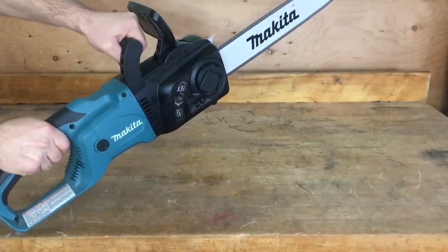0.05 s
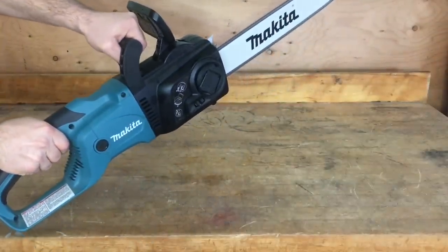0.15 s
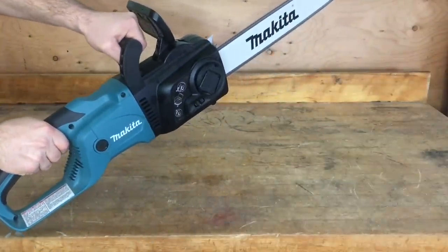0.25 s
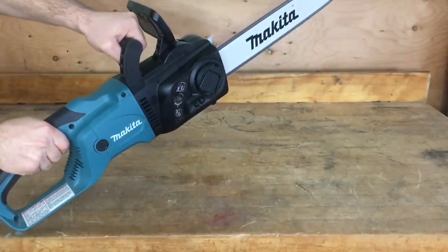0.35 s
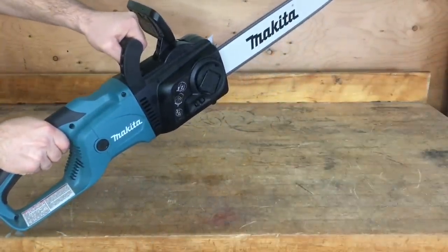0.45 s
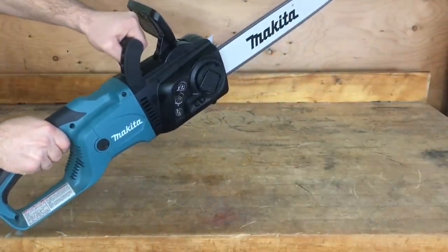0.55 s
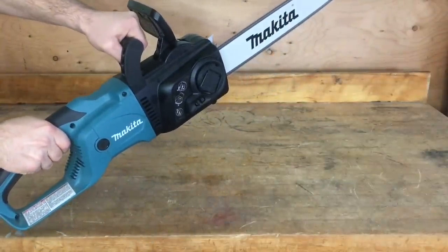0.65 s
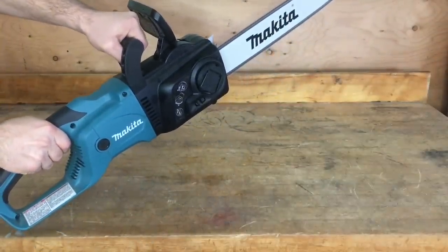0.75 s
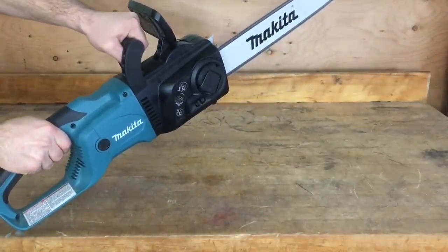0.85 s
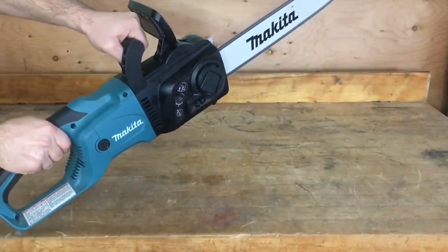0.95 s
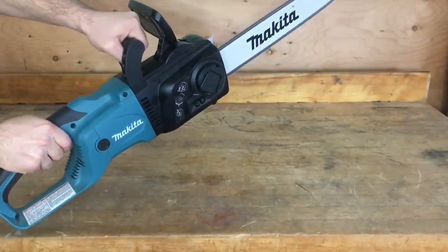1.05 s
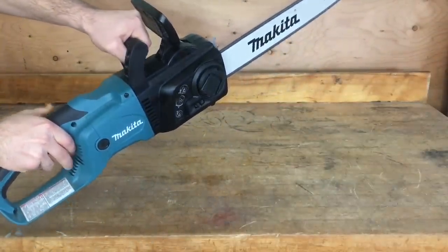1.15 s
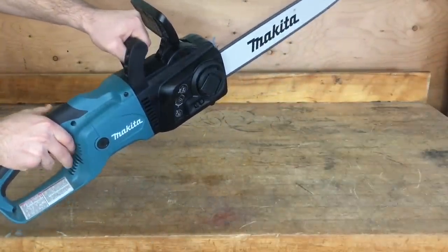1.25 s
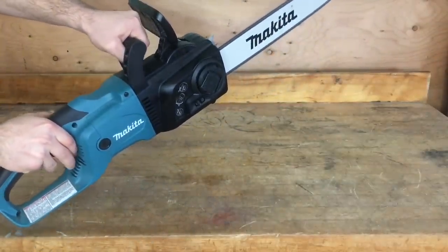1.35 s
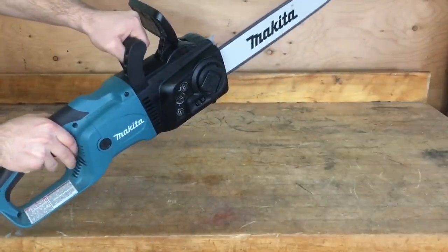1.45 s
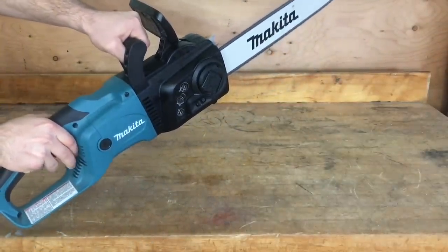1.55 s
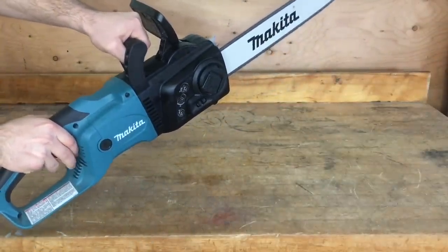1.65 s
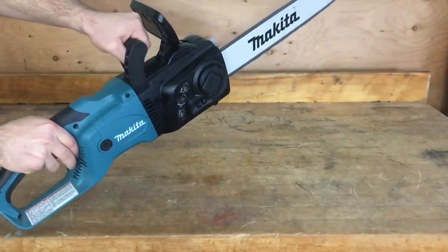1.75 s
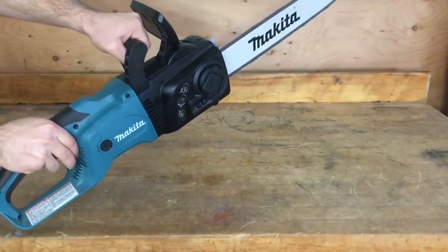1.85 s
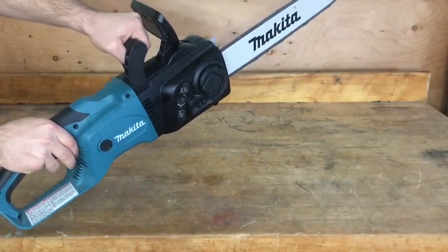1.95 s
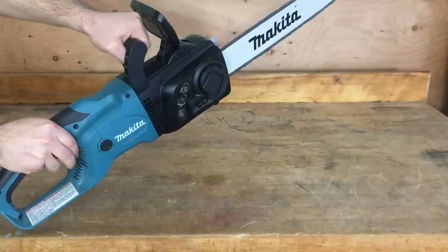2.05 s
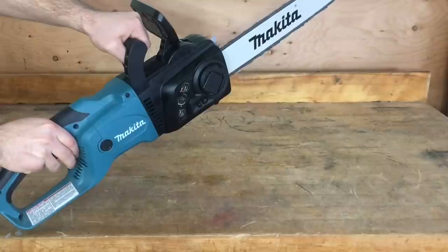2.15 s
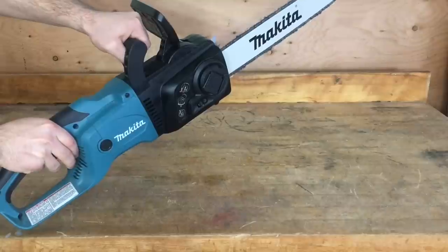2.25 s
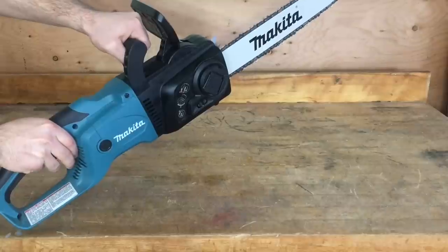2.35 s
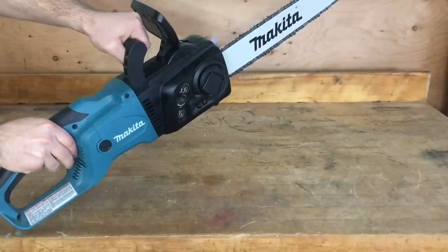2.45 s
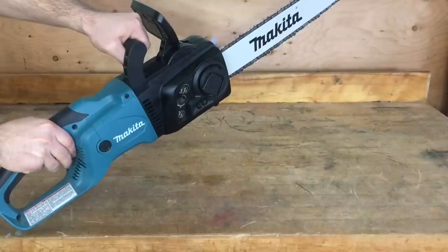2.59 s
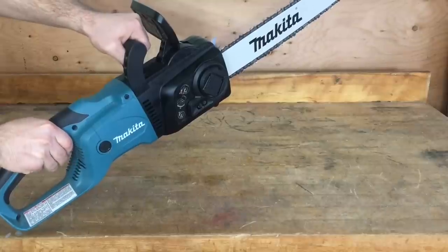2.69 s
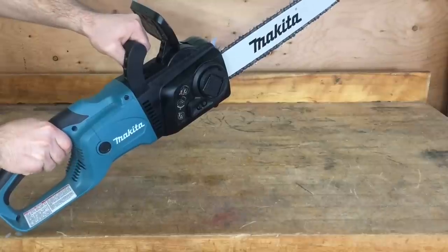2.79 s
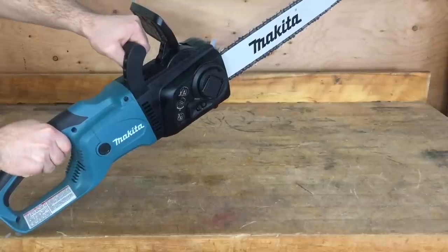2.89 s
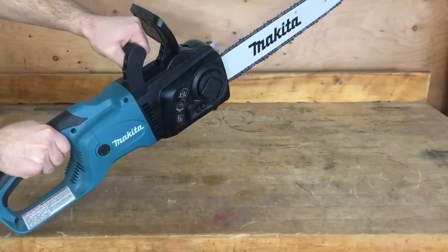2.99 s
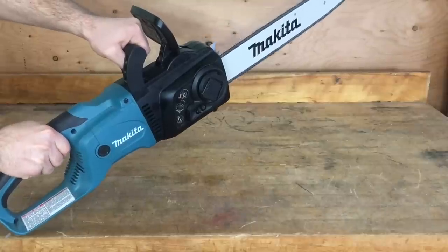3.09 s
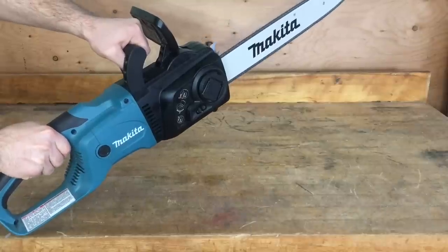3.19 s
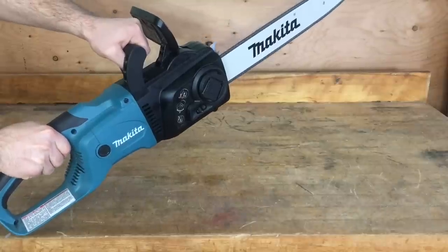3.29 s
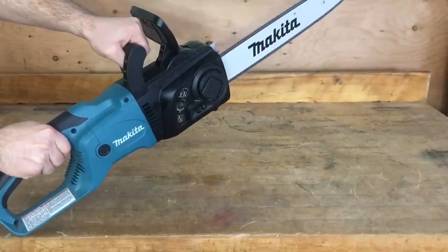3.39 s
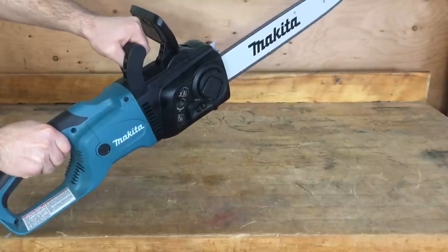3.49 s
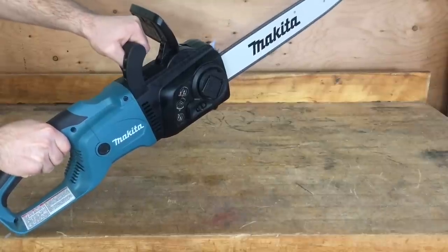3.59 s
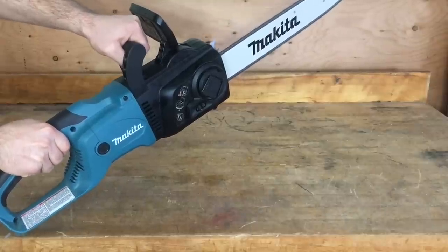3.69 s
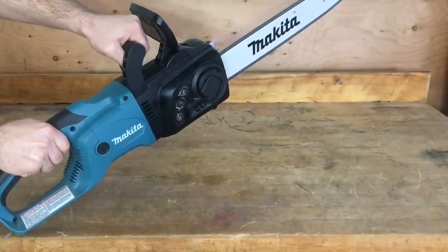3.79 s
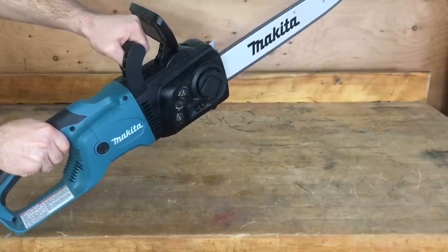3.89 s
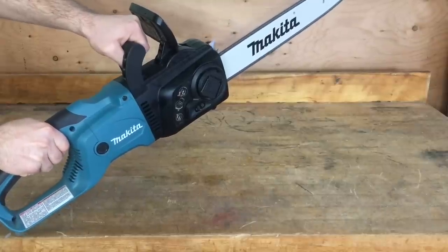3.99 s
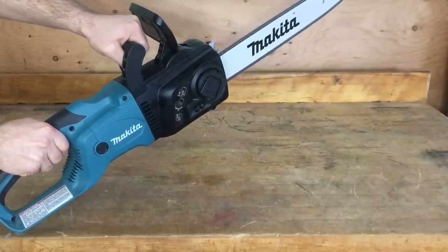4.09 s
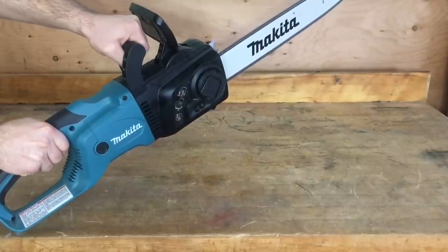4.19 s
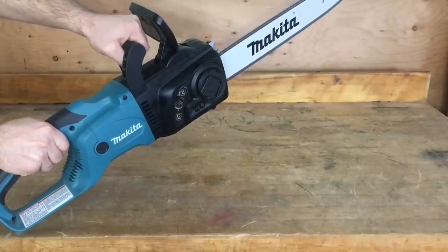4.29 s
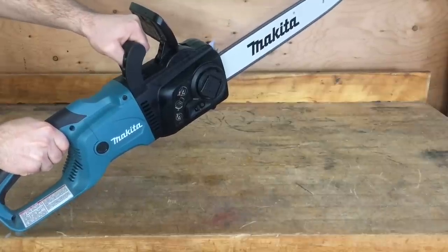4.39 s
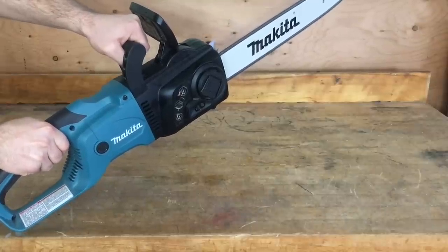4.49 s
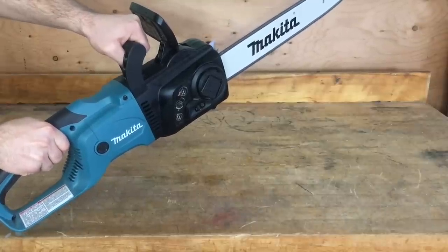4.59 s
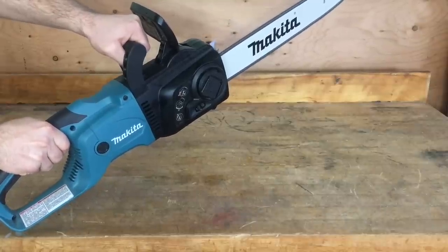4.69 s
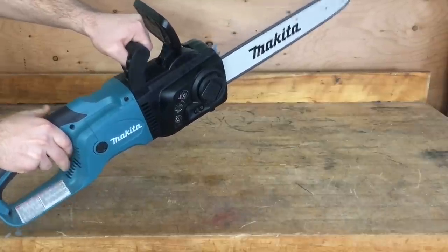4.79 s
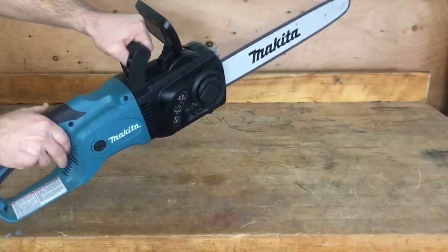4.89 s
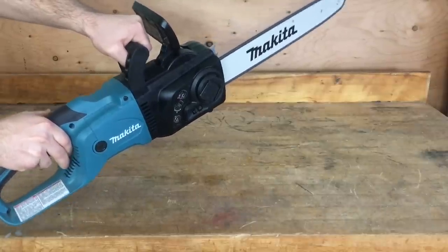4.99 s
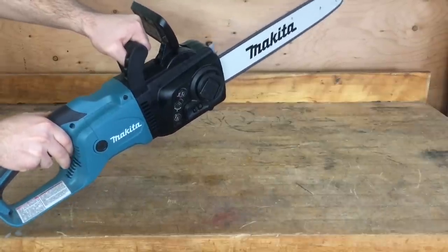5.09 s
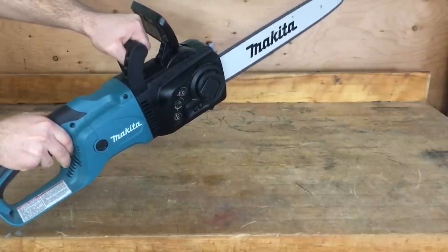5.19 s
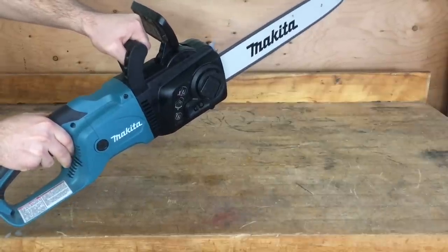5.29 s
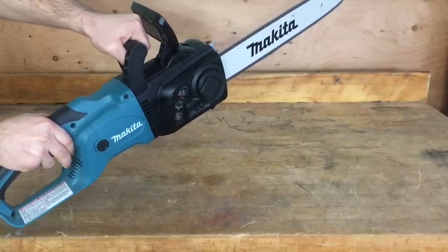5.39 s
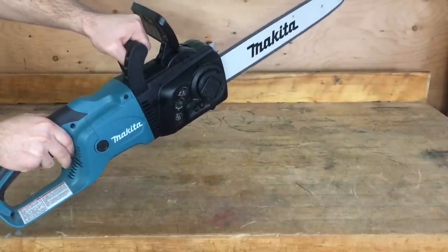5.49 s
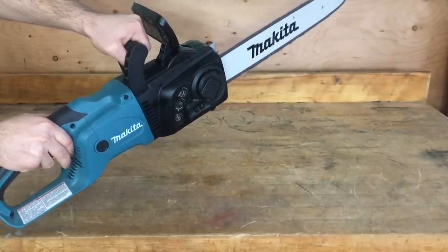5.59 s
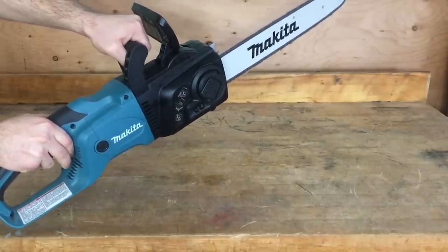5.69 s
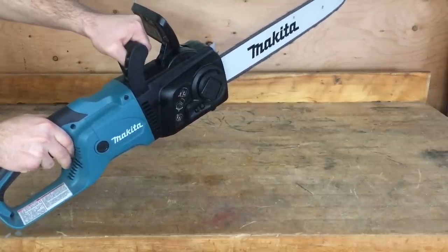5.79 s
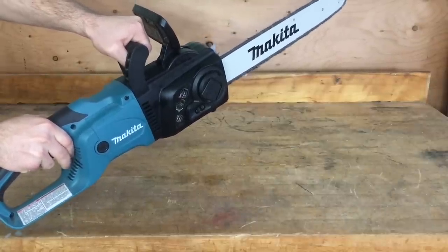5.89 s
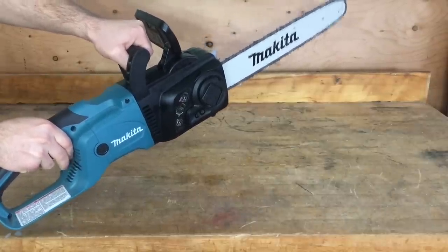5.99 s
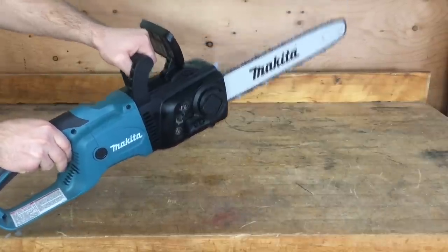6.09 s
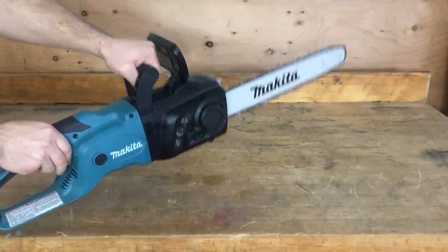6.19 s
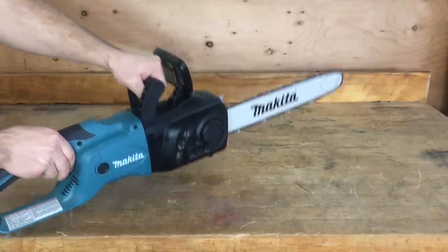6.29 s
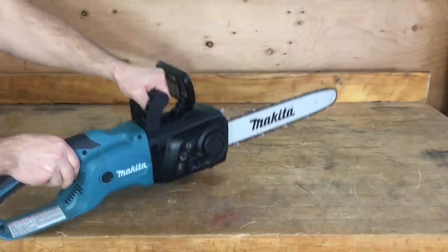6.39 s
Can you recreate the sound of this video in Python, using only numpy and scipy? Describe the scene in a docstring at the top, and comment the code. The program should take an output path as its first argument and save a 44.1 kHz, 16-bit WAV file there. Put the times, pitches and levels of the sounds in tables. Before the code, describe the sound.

An electric chainsaw, close to the microphone in a small wooden workshop, is already revving up to a bright, hissing whine. The trigger is released; the chain jolts, rattles and slows into separate clunks and ticks. After a quiet pause the trigger clicks, a low buzz and a dull knock start the chain, pitch climbs fast to full speed, and it is braked to rest again.

```python
"""An electric chainsaw runs free in a small wooden workshop, close to a mono microphone.
It finishes one run-up, is braked and coasts to rest link by link; the trigger clicks, the soft start buzzes,
and a second run-up ends the same way. Links are random clicks through housing and clink spectra, the rush is
shaped noise, hum, gears and magnetic whine are sines; all follow the rotor speed. A dying tail of echoes,
faint air noise and a slow gain control surround them."""
import sys
import numpy as np
from scipy import signal
from scipy.fft import rfft, irfft
from scipy.io import wavfile
from scipy.ndimage import uniform_filter1d

SR = 44100
rng = np.random.default_rng(int(sys.argv[2]) if len(sys.argv) > 2 else 0)


def ratio_of_db(decibels):
    """Turn decibels (scalar or array-like) into linear amplitude factors; 0 dB maps to 1."""
    return 10 ** (np.asarray(decibels, float) / 20)


def store_pcm(level_fs):
    """Save levels as 16-bit WAV."""
    pcm = np.round(np.clip(level_fs, -1, 1) * 32767).astype(np.int16)
    wavfile.write(sys.argv[1], SR, np.atleast_2d(pcm).T)


N = 284445

# soft start chopping the mains: t after power on/s, buzz level/dB, brush tick level/dB, judder/0-1
SOFT_START = [(-.03, -110, -120, 0), (-.012, -70, -64, .6), (.035, -62, -62, .9), (.06, -57, -80, .9),
              (.2, -50, -120, .7), (.6, -49, -120, .5), (.72, -57, -120, 0), (1.7, -63, -120, 0),
              (1.85, -95, -120, 0)]
# housing spectrum: f/Hz, density/dB per Hz
HOUSING_SPECTRUM = [(88, -53), (150, -26), (758, -4.5), (832, -4), (1800, -4), (2340, -4.5), (2690, -3.5),
                    (4020, -6.5), (4830, -15.5), (6000, -13), (7800, -47.5), (13200, -120)]
# housing and bar resonances: f/Hz, width/Hz, boost/dB
HOUSING_MODES = [(823, 35, 4.5), (866, 24, 2.5), (909, 35, 4.5), (1320, 60, 5.5), (2118, 40, 5),
                 (2335, 90, 7.5), (2640, 70, 2.5), (3080, 60, 4), (3215, 70, 6), (3340, 80, 6),
                 (3458, 70, 5), (3960, 150, 5)]
# clink of slow links: f/Hz, density/dB per Hz
CLINK_SPECTRUM = [(2650, -26), (4500, -17.5), (5060, -12.5), (6150, -3), (7980, -7.5), (8970, -0.5),
                  (10600, -8.5), (11900, -1), (15000, 1.5), (16000, -9)]

CHOP_HZ = 120
LINKS_PER_TURN = 2
JOLT_DECAY_S = .11   # the brake shakes the chain


def rms_one(x):
    """Scale to rms 1."""
    return x / np.sqrt(np.mean(x ** 2) + 1e-20)


def drift(rate_hz):
    """Slow chance of rms 1: noise through two equal poles at rate_hz."""
    r = np.exp(-2 * np.pi * rate_hz / SR)
    noise = rng.standard_normal(N + SR)
    return rms_one(signal.lfilter([1], [1, -2 * r, r * r], noise)[SR:])


def response(spectrum, modes=()):
    """Minimum-phase impulse response, peak 1, of a spectrum with resonances on top."""
    hz = np.maximum(np.arange(16384 // 2 + 1) * SR / 16384, 1)
    spectrum_hz, spectrum_db = np.transpose(spectrum)
    db = np.interp(np.log(hz), np.log(spectrum_hz), spectrum_db)
    for centre_hz, width_hz, boost_db in modes:
        db += boost_db / (1 + (2 * (hz - centre_hz) / width_hz) ** 2)
    cepstrum = irfft(db * np.log(10) / 20)
    half = len(cepstrum) // 2
    cepstrum[1:half] *= 2   # fold the cepstrum forward in time
    cepstrum[half + 1:] = 0
    impulse = irfft(np.exp(rfft(cepstrum)))[:half]
    return impulse / np.abs(impulse).max()


def through(x, impulse):
    """Convolve, cut to N samples."""
    return signal.fftconvolve(x, impulse)[:N]


def evened(x):
    """Local rms brought to 1, so that a level curve sets the loudness at any click rate."""
    return x / np.sqrt(uniform_filter1d(x ** 2, size=8000) + 1e-12)


def dulled(x, cutoff_hz):
    """One-pole low-pass: a softer contact."""
    return signal.sosfilt(signal.butter(1, cutoff_hz, fs=SR, output="sos"), x)


def band_noise(low_hz, high_hz):
    """Noise of rms 1 in one band."""
    sos = signal.butter(2, [low_hz, high_hz], "band", fs=SR, output="sos")
    return rms_one(signal.sosfilt(sos, rng.standard_normal(N)))


def read(rows, at):
    """Each column of a table at the given values of its first."""
    first, *columns = np.transpose(rows)
    return [np.interp(at, first, c) for c in columns]


def blows(events, impulse, bounce_s):
    """Each blow is a click with a short dying scatter of bounces."""
    at_s, level_db = np.transpose(events)
    t = np.arange(2000) / SR
    scatter = rng.standard_normal((len(at_s), len(t))) * .53 * np.exp(-t / bounce_s)
    scatter[:, 0] = 1
    clicks = np.zeros(N + len(t))
    for s, db, burst in zip(at_s, level_db, scatter):
        start = round(s * SR)
        clicks[start:start + len(t)] += ratio_of_db(db) * burst
    return through(clicks[:N], impulse)


def since(column):
    """Seconds since power on, release or rest (column 0, 1, 2) of the run that is under way."""
    # runs: power on t/s, trigger let go t/s, chain at rest t/s
    runs = [(-.65, 1.16, 2.315), (3.0, 4.805, 5.99)]
    t = np.arange(N) / SR
    pauses_s = [(done[2] + coming[0]) / 2 for done, coming in zip(runs, runs[1:])]
    return t - np.array(runs)[np.searchsorted(pauses_s, t), column]


def driven_speed(s):
    """Turns per second under power: a soft ramp, then the gap to top speed closes exponentially."""
    ramp_turns_per_s2, full_power_s, top_turns_per_s = 392, .6, 385
    settle_s, surge_share, surge_s = .363, .093, .08   # a small share of the gap closes at once
    full_s = np.maximum(s - full_power_s, 0)
    gap = (1 - surge_share) * np.exp(-full_s / settle_s) + surge_share * np.exp(-full_s / surge_s)
    ramp = ramp_turns_per_s2 * np.clip(s, 0, full_power_s)
    return ramp + (top_turns_per_s - ramp) * (1 - gap)


def rotor():
    """Turns per second: ramp, settle, then coast under drag and friction."""
    friction_turns_per_s = 70   # air drag rules above this speed, friction below
    on, off, rest = since(column=0), since(column=1), since(column=2)
    left = np.clip(rest / (rest - off), 0, 1)
    start_angle = np.arctan(driven_speed(on - off) / friction_turns_per_s)
    coasting = friction_turns_per_s * np.tan(left * start_angle)
    return np.where(off < 0, driven_speed(on), coasting)


def contacts(speed, loose_per_link, spread_db, slide):
    """Links strike the sprocket in turn, loose contacts fall in clumps, and the chain slides in its groove."""
    sprocket_teeth = 6
    links = np.cumsum(LINKS_PER_TURN * speed) / SR + .12 * drift(40)
    strike = np.diff(np.maximum.accumulate(np.floor(links)), prepend=0) > 0
    tooth_db = 2 * np.cos(2 * np.pi * links / sprocket_teeth)   # the sprocket runs off centre
    loose_per_s = loose_per_link * LINKS_PER_TURN * speed * ratio_of_db(tooth_db + 3 * drift(35))
    loose = rng.random(N) < loose_per_s / SR
    sizes = ratio_of_db(spread_db * np.minimum(rng.exponential(1, N), 3)) * rng.choice([-1, 1], N)
    return sizes * (strike * ratio_of_db(tooth_db + 4.5) + loose) + slide * rng.standard_normal(N)


def housing(x, ring):
    """Housing resonances, boosted ring-fold in dB, that waver randomly a little higher and lower."""
    wander_share, wander_hz = .009, 8   # share of pitch between the lowest and highest tuning
    lean = np.pi / 4 * (1 + np.tanh(drift(wander_hz)))

    def tuned(way):
        modes = [(hz * (1 + way * wander_share), width_hz, db) for hz, width_hz, db in HOUSING_MODES]
        return through(x, response(HOUSING_SPECTRUM, modes * ring))
    return evened(np.cos(lean) ** 2 * tuned(-.5) + np.sin(lean) ** 2 * tuned(.5))


def chain_levels(speed):
    """Loudness follows speed; a faint swell while slack, more rattle under the brake."""
    # chain: speed/turns per s, housing rattle level/dB, bright rush of links and air level/dB
    by_speed = [(0, -110, -110), (0.99, -61, -46.5), (14.96, -51, -45), (23.44, -43, -39.5),
                (46.7, -33.5, -34.5), (88.5, -23.5, -27.5), (135.2, -18.5, -20), (224.4, -18, -12),
                (237, -16.5, -9), (373, -16, -2)]
    rattle_db, bright_db = read(by_speed, speed)
    bitten, off = since(column=0) - .104, since(column=1)   # slack until the sprocket bites
    jolt_db, jolt_rise_s = 7, .02
    rattle_db += jolt_db * np.clip(off / jolt_rise_s, 0, 1) * np.exp(-np.abs(off) / JOLT_DECAY_S)
    lumps_db, lumps_hz, lumps_below_turns_per_s = 4.5, 45, 130   # a slow chain rattles unevenly
    rattle_db += lumps_db * np.clip(1 - speed / lumps_below_turns_per_s, 0, 1) * drift(lumps_hz)
    not_taut = np.exp(-np.abs(bitten) / .035)   # the links brighten as the chain pulls taut
    bright_db -= 12.5 * not_taut
    rattle_db -= 15.5 * not_taut
    slack_rattle_db, slack_bright_db, swell_db_per_s = -44, -52.5, 190
    swell_db = swell_db_per_s * bitten   # the slack shiver swells up to the bite
    return (np.where(bitten < 0, slack_rattle_db + swell_db, rattle_db),
            np.where(bitten < 0, slack_bright_db + swell_db, bright_db))


def chain(speed):
    """The contacts shake the housing and clink; with speed the clink melts into a rush of air."""
    # rush of air: f/Hz, density/dB per Hz
    rush_spectrum = [(50, -52), (200, -41.5), (1760, -26.5), (3000, -11), (4000, -8), (4860, -11),
                     (5880, -6), (7670, -6), (8760, -2), (9460, -2), (10400, -4.5), (14200, -1),
                     (15100, -1.5), (16000, 1)]
    rattle_db, bright_db = chain_levels(speed)
    judder = np.clip(read(SOFT_START, since(column=0))[2], 0, 1)
    shakes = contacts(speed, loose_per_link=9, spread_db=2.2, slide=.2)
    damped, ringing = housing(shakes, ring=1), housing(shakes, ring=2)
    free = .4 * np.clip(since(column=1) / JOLT_DECAY_S, 0, 1)   # without drive the housing rings more freely
    rattle = (1 - free) * damped + free * ringing
    soft = np.clip(1 - speed / 55 + judder, 0, 1)   # slow or juddering links land heavily, duller
    rattle = (1 - soft) * rattle + 8.3 * soft * dulled(dulled(rattle, 1300), 3300)
    rattle *= 1 + .18 * judder * np.cos(2 * np.pi * CHOP_HZ * np.arange(N) / SR)   # torque comes in pulses
    rattle *= ratio_of_db(2.4 * judder * drift(25))
    clinks = contacts(speed, loose_per_link=2.5, spread_db=3, slide=.2)
    clink = through(clinks, response(CLINK_SPECTRUM))
    rush = through(rng.standard_normal(N) * ratio_of_db(1.2 * drift(150)), response(rush_spectrum))
    fast = np.clip((speed - 90) / 190, 0, 1)
    bright = np.sqrt(1 - fast) * evened(clink) + np.sqrt(fast) * rms_one(rush)
    return ratio_of_db(rattle_db) * rattle + ratio_of_db(bright_db) * bright


def motor_levels(speed):
    """Hum, gear and whine levels in dB under power or under the brake; the whine is gone soon after release."""
    # under power: speed/turns per s, hum level/dB, gear level/dB, magnetic whine level/dB
    driven = [(40, -80, -70, -80), (125, -45, -33, -60), (200, -36, -30, -39), (240, -28, -36, -26),
              (292, -28, -37, -18), (306, -26, -50, -17), (368, -21, -50, -13), (380, -21, -44, -17)]
    # under the brake: speed/turns per s, hum level/dB, gear level/dB
    braked = [(50, -90, -90), (115, -58, -50), (185, -31, -30), (265, -27, -30), (335, -19, -31),
              (380, -18, -40)]
    off = since(column=1)
    hum_db, gear_db, whine_db = read(driven, speed)
    braked_hum_db, braked_gear_db = read(braked, speed)
    whine_fade_db_per_s = 604
    return (np.where(off < 0, hum_db, braked_hum_db), np.where(off < 0, gear_db, braked_gear_db),
            whine_db - whine_fade_db_per_s * np.clip(off, 0, .5))


def motor(speed):
    """Rotor-locked hum, magnetic slot whine and rough gear mesh, which flares where it crosses a resonance."""
    # hum partials: multiple of rotor speed, level/dB
    hum_orders = [(1, -20), (2.01, -2.5), (3.01, -8.5), (4.02, -5.5), (6.03, -6.5), (7.95, -7)]
    gear_teeth, slot_multiple = 12.15, 39
    hum_db, gear_db, whine_db = motor_levels(speed)
    turns = 2 * np.pi * np.cumsum(speed) / SR   # rad
    hum = sum(ratio_of_db(db + 1.5 * drift(20)) * np.sin(k * turns + .2 * drift(15)) for k, db in hum_orders)
    mesh = ratio_of_db(4 * drift(60)) * np.sin(gear_teeth * turns + 1.4 * drift(55))
    gear_spectrum = [(300, -39), (1500, -8.5), (4000, 10.5), (4400, -1.5)]   # f/Hz, level/dB
    # modes doubled: a tone sits squarely on each
    gear = through(ratio_of_db(gear_db) * mesh, response(gear_spectrum, HOUSING_MODES * 2))
    whine = ratio_of_db(2.5 * drift(25)) * np.sin(slot_multiple * turns + .5 * drift(30))
    return ratio_of_db(hum_db) * hum + gear + ratio_of_db(whine_db) * whine


def soft_start():
    """One current pulse each mains half-cycle: a low buzz and at first a faint tick at the brushes."""
    buzz_db, tick_db, _ = read(SOFT_START, since(column=0))
    pulses = np.zeros(N)
    pulses[(np.arange(.0068, N / SR - .01, 1 / CHOP_HZ) * SR).astype(int)] = 1
    buzz = signal.sosfilt(signal.butter(2, [110, 520], "band", fs=SR, output="sos"), pulses)
    tick = dulled(through(pulses * ratio_of_db(1.5 * drift(82)), response(CLINK_SPECTRUM)), 6000)
    return ratio_of_db(buzz_db) * rms_one(buzz) + ratio_of_db(tick_db) * rms_one(tick)


def workshop(x):
    """A dense dying tail of noise; wooden walls swallow the treble sooner."""
    low_t60_s, treble_t60_s, wall_cut_hz = .4, .23, 3500
    t = np.arange(SR // 2) / SR
    noise = rng.standard_normal(len(t)) * (t > .004)
    low = signal.sosfilt(signal.butter(2, wall_cut_hz, fs=SR, output="sos"), noise)
    tail = low * ratio_of_db(-60 * t / low_t60_s) + .71 * (noise - low) * ratio_of_db(-60 * t / treble_t60_s)
    return through(x, tail / np.sqrt(np.sum(tail ** 2)))


def background():
    """Faint broad noise and a wavering low hum, which is narrow-band noise."""
    # air of the quiet workshop: f/Hz, density/dB per Hz
    air_spectrum = [(41, -44), (70, -14), (124, -9), (148, -18.5), (286, -15.5), (472, -24), (711, -25),
                    (2500, -36.5), (16000, -37.5)]
    air_db, hum_db, hum_hz, hum_width_hz = -64, -65, 45.5, 12
    air = rms_one(through(rng.standard_normal(N), response(air_spectrum)))
    hum = band_noise(hum_hz - hum_width_hz / 2, hum_hz + hum_width_hz / 2)
    return ratio_of_db(air_db) * air + ratio_of_db(hum_db) * hum


def housing_knocks():
    """Single knocks ring the housing, each dulled by its own low-pass."""
    # knocks: t/s, level before dulling/dB, cutoff f/Hz
    knocks = [(1.92, -29, 900), (1.965, -26, 800), (2.042, -27, 900), (2.105, -24, 1200), (2.144, -23, 700),
              (2.191, -31, 700), (2.223, -30.5, 2000), (2.27, -34, 900), (2.296, -28, 900),
              (3.034, -35.5, 900), (3.066, -29, 700), (3.116, -20, 1200), (3.184, -6.5, 600),
              (5.535, -30, 700), (5.556, -21, 700), (5.699, -24.5, 2000), (5.765, -22.5, 1100),
              (5.798, -25.5, 1000), (5.832, -27, 900), (5.873, -32.5, 1000), (5.921, -29.5, 1300),
              (5.974, -28, 750)]
    body = response(HOUSING_SPECTRUM, HOUSING_MODES)
    return sum(dulled(blows([(s, db)], body, bounce_s=.0078), cutoff_hz) for s, db, cutoff_hz in knocks)


def link_ticks():
    """Single bright ticks of slow links: clicks through the clink spectrum."""
    # ticks: t/s, level/dB
    ticks = [(2.1066, -29), (2.1899, -21.5), (2.2408, -20), (2.3087, -25.5), (3.1033, -28.5), (3.131, -33),
             (3.1497, -24), (3.2008, -23.5), (5.7363, -29), (5.7638, -25.5), (5.8002, -21.5), (5.8391, -30),
             (5.8795, -23.5), (5.9269, -18.5), (5.9843, -20)]
    return blows(ticks, response(CLINK_SPECTRUM), bounce_s=.0035)


def trigger():
    """The plastic trigger clicks before the second start: each snap rings the hollow handle, dulled twice."""
    # snaps: t/s, level before dulling/dB, cutoff f/Hz
    snaps = [(2.4965, -50, 14100), (2.544, -54, 5970), (2.852, -28, 12100), (2.9, -23, 1300)]
    # handle resonances: f/Hz, width/Hz, boost/dB
    handle_modes = [(630, 200, 9), (1015, 300, 10), (2180, 200, 2.5), (3500, 300, 5)]
    handle = response([(150, -14), (500, -8.5), (16000, 2)], handle_modes)   # f/Hz, level/dB
    return sum(dulled(dulled(blows([(s, db)], handle, bounce_s=.012), cutoff_hz), cutoff_hz)
               for s, db, cutoff_hz in snaps)


def squeak():
    """A short puff of noise in a narrow high band as the slack is taken up."""
    at_s, length_s, centre_hz, level_db = 3.07, .009, 12900, -50
    puff = np.exp(-((np.arange(N) / SR - at_s) / length_s) ** 2)
    return ratio_of_db(level_db) * band_noise(.96 * centre_hz, 1.04 * centre_hz) * puff


def scene():
    """The saw, its echo in the room and the background, the same on both channels."""
    speed = rotor()
    saw = chain(speed) + motor(speed) + soft_start()
    saw += housing_knocks() + link_ticks() + trigger() + squeak()
    echo_db = -7.5
    return np.tile(saw + ratio_of_db(echo_db) * workshop(saw) + background(), (2, 1))


def lag(x, seconds, start):
    """One-pole smoothing from a starting value."""
    r = np.exp(-1 / (seconds * SR))
    return signal.lfilter([1 - r], [1, -r], x, zi=[r * start])[0]


def gain_control(x):
    """Gain sinks slowly while the sound is loud and creeps back after."""
    threshold_db, share, listen_s, turn_s, start_db = -16, .78, .13, .27, -1
    power = np.mean(x ** 2, axis=0)
    level_db = 10 * np.log10(lag(power, listen_s, power[:SR // 20].mean()) + 1e-12)
    target_db = -share * np.maximum(level_db - threshold_db, 0)
    return x * ratio_of_db(lag(target_db, turn_s, start_db))


def low_pass(x):
    """Removes everything above the highest recorded frequency."""
    return signal.sosfilt(signal.butter(12, 16740, fs=SR, output="sos"), x)


def record(dry):
    """Gain control, then top and bottom are cut and peaks clipped at full scale."""
    low_passed = signal.sosfilt(signal.cheby2(16, 50, 15900, fs=SR, output="sos"), gain_control(dry))
    mix = signal.sosfilt(signal.butter(4, 38, "high", fs=SR, output="sos"), low_passed)
    return low_pass(np.clip(mix, -1, 1))


dry = scene()
out = record(dry)
store_pcm(out)
```